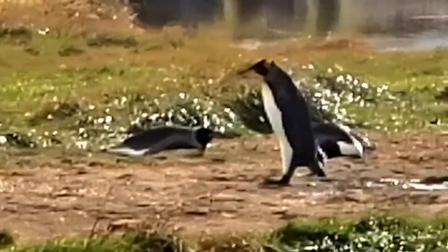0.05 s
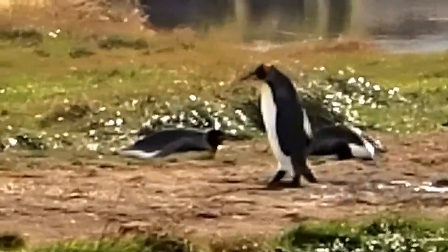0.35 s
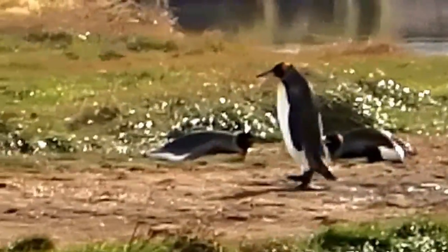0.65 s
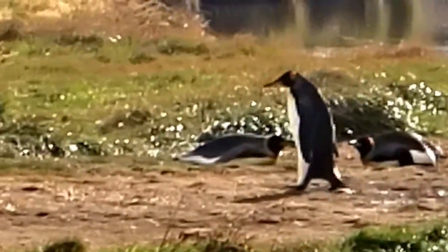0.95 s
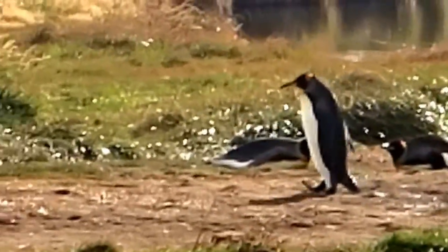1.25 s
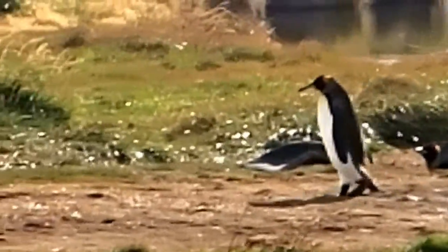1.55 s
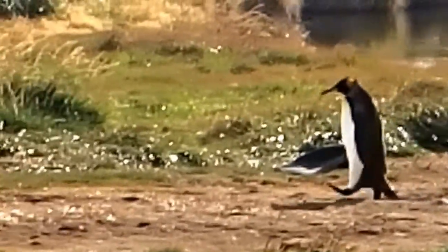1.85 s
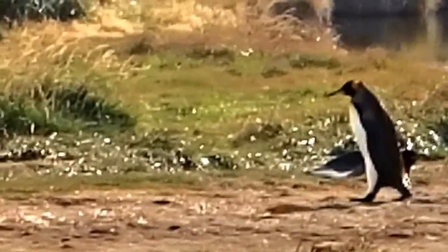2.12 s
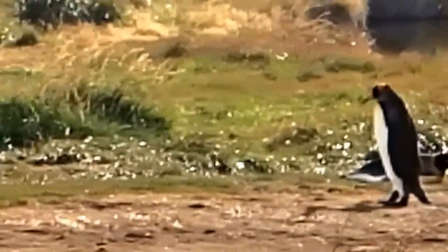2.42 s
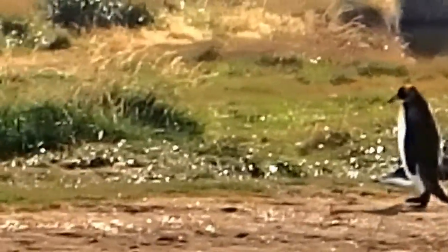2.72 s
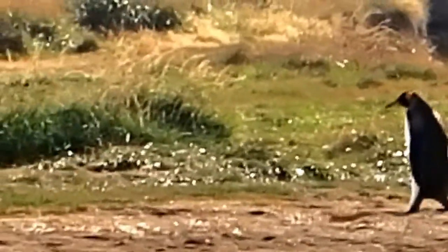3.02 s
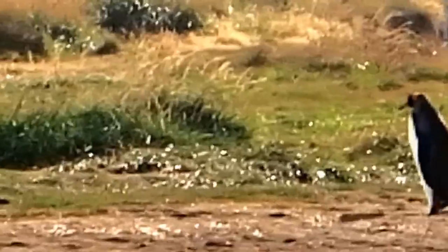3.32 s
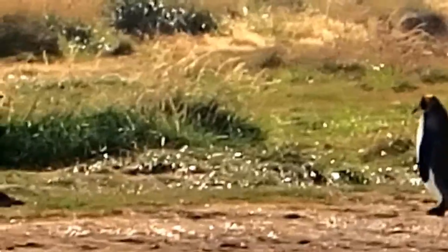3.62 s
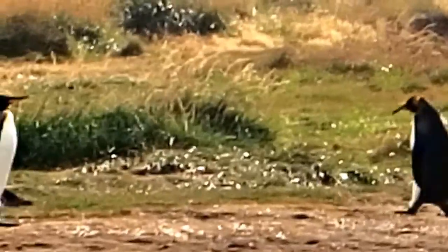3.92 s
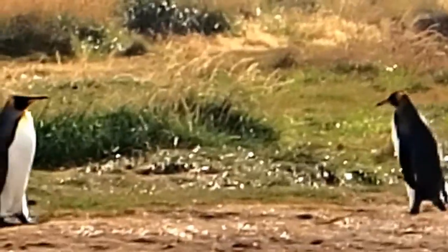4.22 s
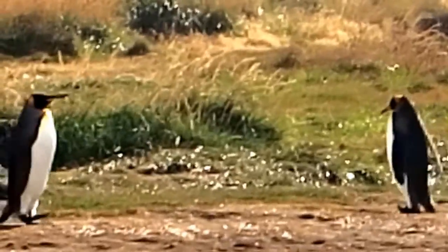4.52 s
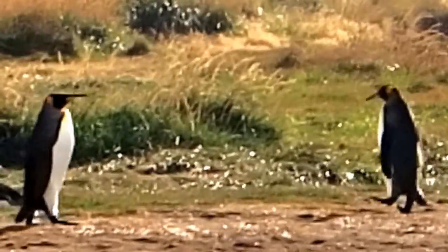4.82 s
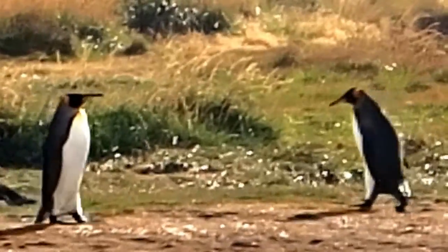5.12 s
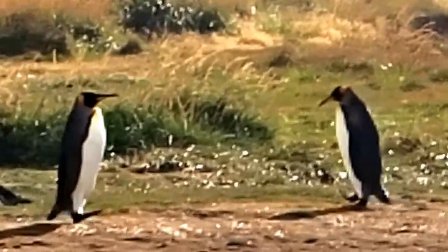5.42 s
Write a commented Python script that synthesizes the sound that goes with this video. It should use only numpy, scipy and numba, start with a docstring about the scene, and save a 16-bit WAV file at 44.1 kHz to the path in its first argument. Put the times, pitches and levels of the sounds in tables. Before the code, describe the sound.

A penguin trumpets in a loud run of clear and throbbing notes, after a jacket rustles and wind bumps the microphone.

```python
"""A king penguin trumpets on an open, breezy shore, now in clear notes, now with a rough throb.
Before it calls, a jacket swishes close by and a faint low hoot sounds far off. Puffs of wind
bump the microphone throughout. The bird's voice box (syrinx) has two sides that sound together:
when they lock in step we hear one clear note, and when they slip apart they beat and throb."""
import sys
import numpy as np
from scipy import signal
from scipy.io import wavfile
from scipy.ndimage import uniform_filter1d
from numba import njit

SR = 44100
rng = np.random.default_rng(int(sys.argv[2]) if len(sys.argv) > 2 else 0)


def int16_out(signal):
    """Quantize to a 16-bit WAV file."""
    q = np.round(np.clip(np.atleast_2d(signal).T, -1, 1) * 32767)
    wavfile.write(sys.argv[1], SR, q.astype(np.int16))


N = 245195
TIME = np.arange(N) / SR

# How alike moving air sounds on the left and right: f/Hz, likeness (1 same, 0 unrelated, -1 opposite)
AIR_LIKENESS = [(100, 0.11), (300, 0.24), (700, 0.49), (3000, 0.33), (5000, -0.16), (7500, 0.062),
                (15000, -0.12)]


def from_db(db):
    """Turn decibels into a factor to multiply by."""
    return 10 ** (np.asarray(db) / 20)


def rms_one(x):
    """Scale a signal so that its average size (rms) is one."""
    return x / np.sqrt(np.mean(x ** 2) + 1e-20)


def at_hz(points, hz):
    """Read between the rows of a table, on a logarithmic frequency axis."""
    frequencies, values = np.transpose(points)
    return np.interp(np.log(hz), np.log(frequencies), values)


def pan(db):
    """Left and right gains that average one; positive db favours the left."""
    gains = from_db(np.array([[db], [-db]]) / 2)
    return gains / gains.mean()


def ease(start, length):
    """A smooth step from zero to one."""
    return .5 - .5 * np.cos(np.pi * np.clip((TIME - start) / length, 0, 1))


def swell(peak, rise, fall):
    """A rounded hump of height one; all three settings are in seconds."""
    age = TIME - peak
    return np.exp(-np.minimum((age / np.where(age < 0, rise, fall)) ** 2, 20))


def drift(rate):
    """A smooth random wobble of size about one, changing about rate times a second."""
    r = np.exp(-40 * np.pi * rate / SR)
    noise = rng.standard_normal(N // 20 + 2002)  # one value for every 20 samples
    slow = signal.lfilter([1], [1, -2 * r, r * r], noise)[2000:]
    return np.interp(np.arange(N) / 20, np.arange(len(slow)), rms_one(slow))


def cut(x, hz, kind, order=2):
    """Keep the "low" part, the "high" part or a "band" of a sound."""
    sections = signal.butter(order, np.clip(hz, 10, .45 * SR), kind, fs=SR, output="sos")
    return signal.sosfilt(sections, x)


def resonate(x, hz, width):
    """A resonance: sound near hz passes at full strength, the rest is weakened."""
    r = np.exp(-np.pi * width / SR)
    feedback = [1, -2 * r * np.cos(2 * np.pi * hz / SR), r * r]
    return signal.lfilter(np.array([1, 0, -1]) * (1 - r * r) / 2, feedback, x + 1e-18)


def banded_noise(spectrum, likeness, flicker_db):
    """Stereo noise of rms one, in third-octave bands that each flicker on their own."""
    # The microphone's left opening is mostly the more sensitive one: f/Hz, left over right/dB
    balance = [(60, 2.5), (700, 1.5), (2400, 3.5), (5000, 4), (8000, -1), (15000, 1)]
    bottom, top = spectrum[0][0], spectrum[-1][0]
    edges = np.geomspace(bottom, top, round(3 * np.log2(top / bottom)) + 1)
    out, white = 0, rng.standard_normal((2, 2, N))
    for k, (low, high) in enumerate(zip(edges, edges[1:])):
        mid, side = cut(white[k % 2], [low, high], "band")
        hz = np.sqrt(low * high)
        alike = at_hz(likeness, hz)
        gain = from_db(at_hz(spectrum, hz) + flicker_db * drift(16.2)) * pan(at_hz(balance, hz))
        out = out + gain * (np.sqrt(1 + alike) * mid + np.sqrt(1 - alike) * side * [[1], [-1]])
    return rms_one(out)


def breeze():
    """Air moving through the grass makes a soft, steady hiss."""
    # Tone of the breeze: f/Hz, relative level/dB
    spectrum = [(88, -22), (150, -5.5), (308, -8.5), (361, -4), (512, -6), (756, -6.5), (833, -5.5),
                (1120, -9), (1850, -11.5), (2300, -11.5), (3520, -16), (4200, -12.5), (5850, -16.5),
                (9340, -19), (15800, -19.5)]
    return from_db(-49) * banded_noise(spectrum, AIR_LIKENESS, flicker_db=1.07)


def far_hoot(waver=0.017, fade_s=0.035):
    """Distance leaves little of the hoot but its wavering lowest tone."""
    # Course of the hoot: t/s, pitch/Hz, level/dB
    course = [(0.99, 338, -67), (1.04, 315, -47.5), (1.12, 292.5, -71), (1.22, 303, -58),
              (1.33, 292.3, -58.5), (1.55, 273, -62.5), (1.75, 295, -60.5), (2.05, 275, -63.5),
              (2.15, 263, -75)]
    times, pitches, levels = np.transpose(course)
    pitch = np.interp(TIME, times, pitches) * (1 + waver * drift(25))
    level = from_db(np.interp(TIME, times, levels))
    fade_in = np.clip((TIME - times[0]) / fade_s, 0, 1)
    fade_out = np.clip((times[-1] - TIME) / fade_s + 1, 0, 1)
    return level * fade_in * fade_out * np.sqrt(2) * np.sin(2 * np.pi * np.cumsum(pitch) / SR)


def wind_rumble(lull_db=-59, lumpy_db=1.0):
    """Swirls of air rumble at each opening of the microphone, in short gusts over a light breeze."""
    # Tone of the rumble: f/Hz, relative level/dB
    spectrum = [(30, -34), (50, -4), (80, 7), (130, 7), (190, -2.5), (280, -11), (450, -48), (900, -45),
                (3000, -80)]
    # Gusts on the microphone: t/s, level/dB
    gusts = [(.38, -53.5), (.96, -53), (1.32, -47), (1.47, -49.5), (1.67, -50), (1.81, -43.5), (2.04, -55),
             (2.22, -45), (2.37, -55), (2.64, -38.5), (2.88, -63), (3.13, -45.5), (3.362, -59), (3.75, -59),
             (3.92, -44), (4.02, -44.5), (4.28, -41), (4.47, -47), (4.74, -48.5), (4.94, -43.5),
             (5.25, -59)]
    level = from_db(lull_db) + sum(from_db(db) * swell(s, rise=0.037, fall=0.059) for s, db in gusts)
    lumps = rms_one(from_db(lumpy_db * drift(14)))
    return level * lumps * banded_noise(spectrum, AIR_LIKENESS, flicker_db=3.0)


def wind_puffs(boost_db=2.0, push_s=0.00099, wake_s=0.017):
    """Each puff is one push of pressure with a short, swirling wake behind it."""
    # Puffs hitting the microphone: t/s, relative peak level/dB, left over right/dB
    puffs = [(0.381, -40.5, 20), (0.47, -44, 0.5), (0.647, -46, -16), (0.96, -68, 14), (1.302, -41.5, -14),
             (1.452, -39, 17), (1.792, -30.5, 22), (1.826, -22, 15), (1.919, -37.5, 19),
             (2.111, -38.5, -10), (2.217, -32, 24), (2.242, -24, 23), (2.255, -30, 1), (2.368, -43.5, 1.5),
             (2.626, -30, 28), (3.102, -36.5, 10), (3.212, -34, 10), (3.948, -45, 6), (4.0, -39, 10),
             (4.268, -37, 11), (4.329, -40, 7), (4.454, -45, -21), (4.943, -45, -14)]
    out = 0
    for s, db, side_db in puffs:
        age = TIME - s - .003
        push = -np.exp(-.5 * (age / push_s) ** 2)
        wake = 0.16 * drift(140) * (age > 0) * np.exp(-abs(age) / wake_s)
        bump = cut(push + wake + 1e-18, 125, "high", order=3)
        out = out + from_db(db + boost_db) * bump / abs(bump).max() * pan(side_db)
    return out


def jacket(rest_db=-56, rub_db=1.2, grain_db=2.0, crease_db=-15, crease_s=0.0097):
    """The weave catches and slips as it rubs; creases snap over now and then."""
    # Tone of the cloth: f/Hz, relative level/dB
    spectrum = [(250, -3.5), (400, -5.5), (720, -3.5), (1200, -5), (2000, -5.5), (3400, -0.5), (4100, 6),
                (4700, -0.5), (5600, 2), (7000, -13), (10000, -12), (15500, -23)]
    # How alike the cloth sounds on the left and right: f/Hz, likeness (-1 to 1)
    likeness = [(300, 0.59), (1400, 0.99), (5000, 0.16), (7500, -0.15), (15000, -0.38)]
    # Strokes of the sleeve: fastest at t/s, swell/s, fade/s, relative level/dB
    strokes = [(.04, .04, .05, -53.5), (.18, 0.061, 0.032, -38), (1.0, 0.081, .025, -45),
               (1.17, 0.031, 0.066, -50), (1.27, 0.014, .045, -41), (1.525, .12, 0.12, -43),
               (1.89, .025, .025, -53), (2.15, 0.053, 0.12, -42), (2.26, 0.015, 0.03, -42),
               (4.63, 0.034, 0.036, -43.5)]
    # Creases snapping over: t/s, relative peak level/dB
    creases = [(0.0744, -45), (0.607, -27.5), (0.7178, -31.5), (0.771, -28), (1.0156, -24), (1.175, -28.5),
               (1.6444, -38), (2.2475, -37)]
    rub = sum(from_db(db + rub_db) * swell(s, rise, fall) for s, rise, fall, db in strokes)
    rub = rub + from_db(rest_db)  # the cloth never lies quite still
    catching = rms_one(from_db(grain_db * drift(410)))
    snaps = sum(from_db(db + crease_db) * (TIME > s) * np.exp(-abs(TIME - s) / crease_s)
                for s, db in creases)
    return (rub * catching + snaps) * banded_noise(spectrum, likeness, flicker_db=3.0)


def shore_echoes(x, die_away_s=0.14, count=40):
    """Banks and tufts of grass scatter dull echoes, different ones to each side."""
    out = np.zeros((2, N))
    dull = cut(x, 4500, "low")
    delays = rng.uniform(0.00223, .2, count)
    for k, (delay, size) in enumerate(zip(delays, rng.standard_normal(count))):
        lag = int(delay * SR) + 1
        out[k % 2, lag:] += size * from_db(-60 * delay / die_away_s) * dull[:-lag]
    return rms_one(out) * np.std(x)


def mic_all_round(x):
    """The microphone's openings carve a dip and a small peak into sound from all around."""
    return x - resonate(x, hz=4080, width=520) + 0.51 * resonate(x, hz=4650, width=700)


def mic_from_one_side(x):
    """The left opening hears it louder and a sample later; the right flips the wave at its resonance."""
    left = np.roll(x, 1)
    right = x - 2 * resonate(x, hz=4700, width=200)
    return np.array([left, right]) * pan(5.6)


def syllables(slack_hz=363.4, blend_s=0.07):
    """Each syllable tightens, holds and slackens. Detune is the pitch gap between the two sides."""
    # Syllables: start t/s, rise/s, hold/s, fall/s, pitch after rise/Hz, pitch before fall/Hz,
    # pitch after fall/Hz, detune/Hz, accent on the hold/dB, accent after the fall/dB
    song = [(2.701, 0.15, 0.14, 0.19, 481, 472.9, 394.6, 35.04, -0.3, -1.5),
            (3.255, 0.08, .027, 0.2, 477.8, 483, 391.8, 40.77, 0.9, .1),
            (3.57, .087, .03, .102, 486.9, 489.7, 447.4, 43, -0.5, 1.6),
            (3.814, .058, 0.051, 0.021, 481.5, 497.7, 495.6, 32.07, -0.3, -0.3),
            (3.925, .06, .046, .1, 541, 558.9, 414.5, 43.93, -0.2, 3.5),
            (4.099, .165, .052, .3, 549, 515.7, 307.2, 39.97, 0, 2.7),
            (4.629, .087, .004, .2, 454.3, 463.8, 309, 45.05, -2.5, 0.5),
            (4.893, .11, .209, 0.11, 453.5, 518.2, 324.7, 37.11, -0.6, 2.5),
            (5.319, .11, .008, .21, 499, 513.6, 402.2, 35.4, -1.1, 1.5)]
    pitch, detune, accent_db = slack_hz, 0, 0
    from_hz, from_detune, from_accent = slack_hz, 0, 0
    for start, rise, hold, fall, first_hz, last_hz, end_hz, detune_hz, hold_db, end_db in song:
        rising, falling = ease(start, rise), ease(start + rise + hold, fall)
        gliding = np.clip((TIME - start - rise) / hold, 0, 1)
        pitch = pitch + (first_hz - from_hz) * rising + (last_hz - first_hz) * gliding
        pitch = pitch + (end_hz - last_hz) * falling
        accent_db = accent_db + (hold_db - from_accent) * rising + (end_db - hold_db) * falling
        detune = detune + (detune_hz - from_detune) * ease(start - blend_s / 2, blend_s)
        from_hz, from_detune, from_accent = end_hz, detune_hz, end_db
    return pitch, detune, accent_db


def phrase(clear_db=1.3, lead_s=.005):
    """Pitch, detune, level and clearness of the call over time."""
    # Clear notes, where the two sides draw together: start t/s, end t/s, remaining detune/Hz
    clear_notes = [(2.7, 2.801, 6), (2.881, 3.026, 5), (3.324, 3.387, 3.5), (3.636, 3.71, 4),
                   (3.853, 3.918, 5), (4.35, 4.352, 26)]
    # Blowing harder raises pitch and level together: pitch/Hz, base level/dB
    loudness = [(300, -47), (360, -36), (400, -31.5), (445, -29.5), (480, -25.5), (520, -23), (560, -21)]
    draw_in_s, draw_apart_s = 0.0224, .06
    pitch, detune, accent_db = syllables()
    clear = 0
    for start, end, remaining_hz in clear_notes:
        note = ease(start - draw_in_s, draw_in_s) - ease(end, draw_apart_s)
        detune = detune + note * (remaining_hz - detune)
        clear = clear + note
    # in a quick rise one side runs ahead of the other
    detune = detune + (1 - clear) * lead_s * np.maximum(np.gradient(pitch) * SR, 0)
    level_db = at_hz(loudness, pitch) + accent_db + clear_db * clear
    return pitch, detune, level_db, clear


@njit
def phase_slip(detune, pull):
    """How far two linked vibrations get out of step: they lock while the pull exceeds the detune."""
    slip = np.zeros(len(detune))
    for i in range(1, len(slip)):
        slip[i] = slip[i - 1] + detune[i] - pull[i] * np.sin(slip[i - 1])
    return slip


def syrinx(pitch, detune, level_db, clear, grip_hz=10, taut_hz=455, jitter=.0035, rattle_jitter=.011):
    """Two thin flaps of skin (membranes) chop the breath into pulses and tug on each other."""
    step = 2 * np.pi / SR
    # taut membranes pull harder on each other, and harder still in a clear note
    pull_hz = 22 * (pitch / 520) ** 3 + grip_hz * clear
    slip = phase_slip(step * detune * (1 + 0.102 * drift(59.5)), step * pull_hz)
    apart = np.clip(detune / pull_hz - 1, 0, 1)
    # they rattle when they have slipped apart or are still slack
    slack = np.clip((taut_hz - pitch) / 30, 0, 1.3)
    rattle = np.maximum(apart * (420 / pitch) ** 2.4, slack)
    # harder blowing sharpens the pulses; locking rounds them
    db_per_octave = 3.0 + 0.41 * (level_db - level_db.max()) - 1.44 * (1 - apart)
    # one airflow shakes the pitch of both membranes alike
    wobble = (jitter + rattle_jitter * rattle) * rms_one(np.gradient(drift(90)))
    shared_phase = step * np.cumsum(pitch * (1 + wobble))
    source = 0
    for side, side_db in ((-1, 0.039), (0.99, 1.0)):
        phase = shared_phase + side * slip / 2
        pulses = sum(from_db(db_per_octave * np.log2(k)) * np.cos(k * phase) for k in np.arange(1, 21))
        # every other pulse is a touch stronger, and rattling makes them uneven
        strength = 1 + 0.0069 * np.cos(phase / 2) + 0.14 * rattle * drift(120)
        # each membrane is pushed by the opening and closing of the other
        strength = strength * (1 + 0.041 * apart * side * np.sin(slip))
        opening = 1 + np.cos(phase)
        hiss = (1.24 + rattle) * opening * cut(rng.standard_normal(N), 3600, "high")
        source = source + from_db(side_db) * (pulses * strength + hiss)
    return source


def throat(source):
    """The throat and beak ring at some frequencies; at a few others the tone dips."""
    # Throat and beak resonances: f/Hz, width/Hz, relative level/dB
    resonances = [(382, 130, -19.5), (686, 73, -2), (1051, 109, 2.5), (1316, 226, 1), (1548, 123.4, 7.5),
                  (1977, 260, 0), (2390, 102, 5), (2811, 124, -2), (3320, 445, -9.5), (3826, 126, -9.5),
                  (4113, 60, -11), (4630, 98, -6), (4870, 227, -10.5), (5280, 183, -7.5), (5283, 102, -10),
                  (5810, 920, -21.5)]
    # Dips in the call's tone (the one near 4 kHz is the microphone's notch): f/Hz, width/Hz, depth (0-1)
    dips = [(1259, 248, 0.8), (1719, 205, 0.98), (2150, 107, 1), (3044, 57, 1), (4040, 104, 0.9)]
    voice = sum((-1) ** k * from_db(db) * resonate(source, hz, width)
                for k, (hz, width, db) in enumerate(resonances))
    for hz, width, depth in dips:
        voice = voice - depth * resonate(voice, hz, width)
    voice = cut(voice, 7800, "low", order=6)
    return cut(voice, 300, "high")


def penguin(start_s=2.735, attack_s=.055):
    """Both sides of the syrinx buzz into one throat, which shapes the buzz into a trumpeting call."""
    pitch, detune, level_db, clear = phrase()
    voice = throat(syrinx(pitch, detune, level_db, clear))
    # even out the slow changes of level, leaving the throb
    power = uniform_filter1d(uniform_filter1d(voice ** 2, size=1300), size=1300)
    fade_in = np.sqrt(np.clip((TIME - start_s) / attack_s, 0, 1))
    return voice / np.sqrt(power + 1e-12) * from_db(level_db) * fade_in


def scene(echo_db=-21):
    """The bird calls in the open, with the breeze all round."""
    call = penguin()
    around = breeze() + jacket() + from_db(echo_db) * shore_echoes(call)
    background = mic_all_round(around) + far_hoot() * pan(3.0) + wind_rumble() + wind_puffs()
    return background + mic_from_one_side(call)


def record(dry, cutoff_hz=15750):
    """The very highest treble is cut off steeply."""
    return signal.sosfilt(signal.ellip(12, .1, 80, cutoff_hz, fs=SR, output="sos"), dry)


dry = scene()
out = record(dry)
int16_out(out)
```